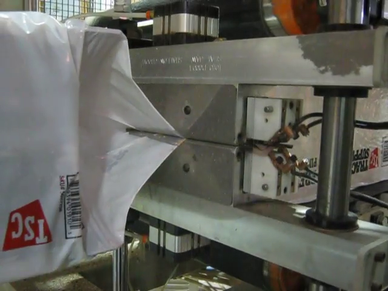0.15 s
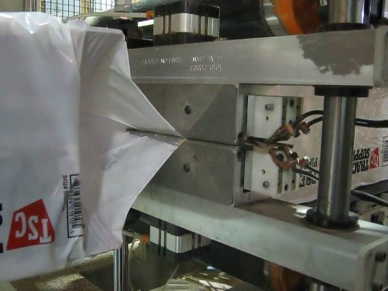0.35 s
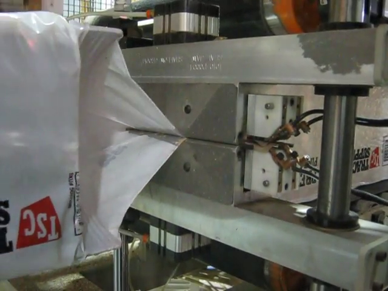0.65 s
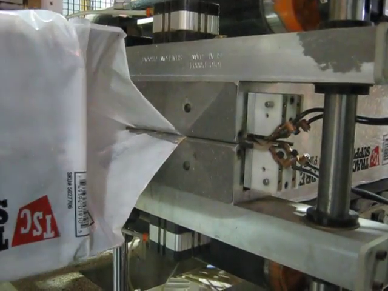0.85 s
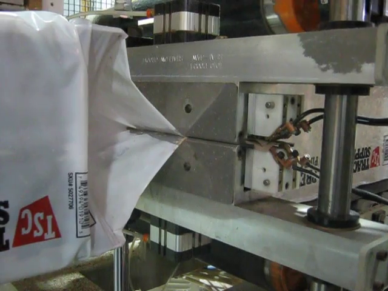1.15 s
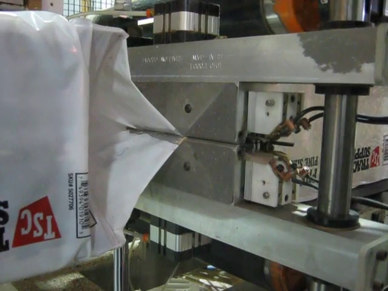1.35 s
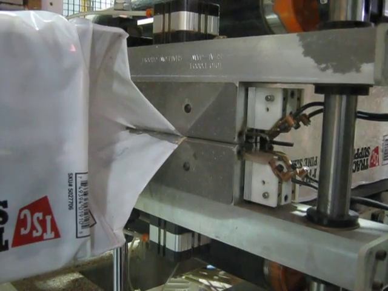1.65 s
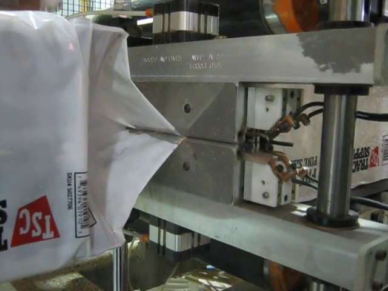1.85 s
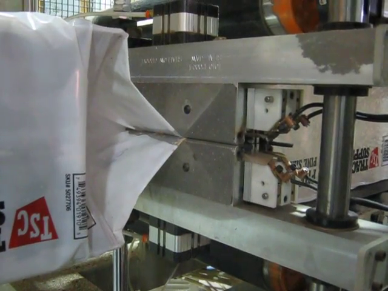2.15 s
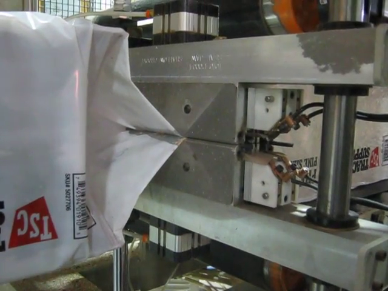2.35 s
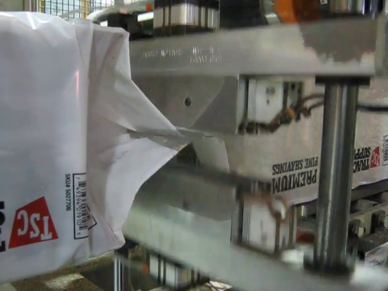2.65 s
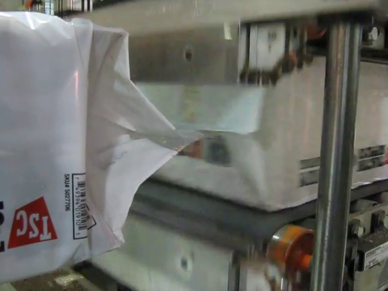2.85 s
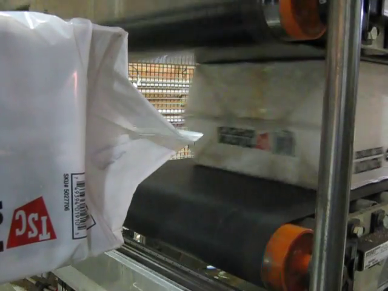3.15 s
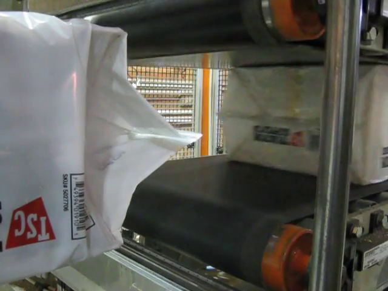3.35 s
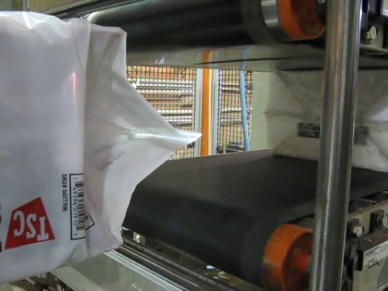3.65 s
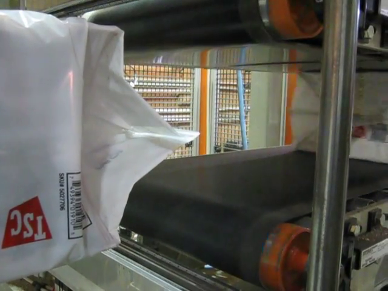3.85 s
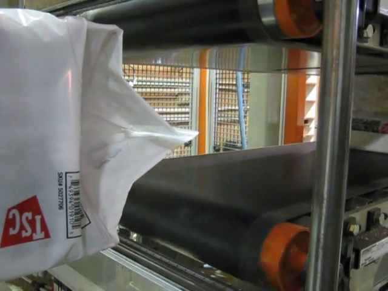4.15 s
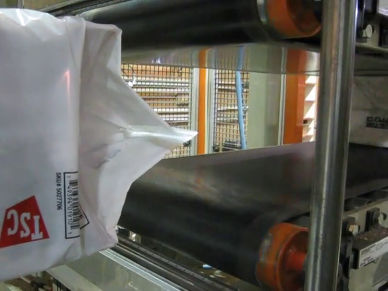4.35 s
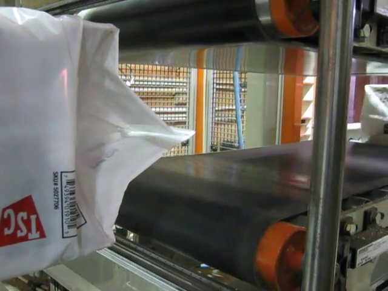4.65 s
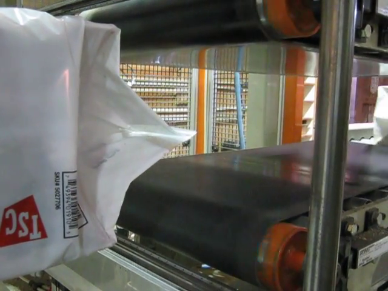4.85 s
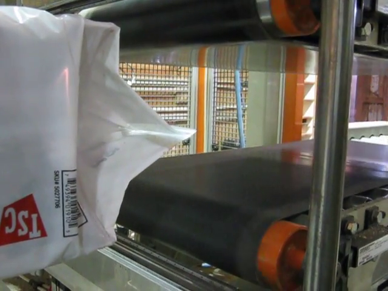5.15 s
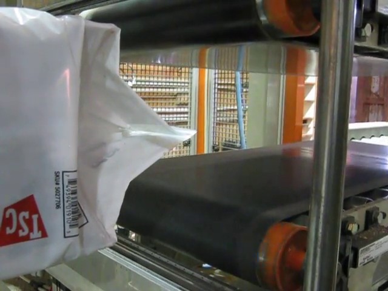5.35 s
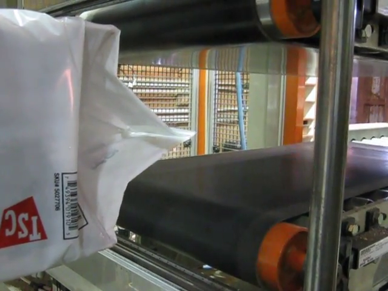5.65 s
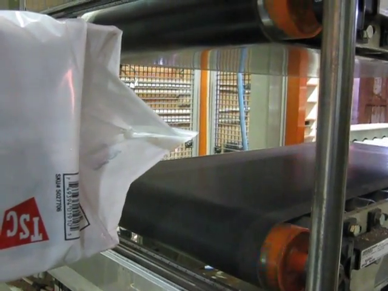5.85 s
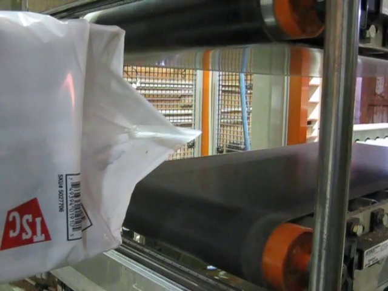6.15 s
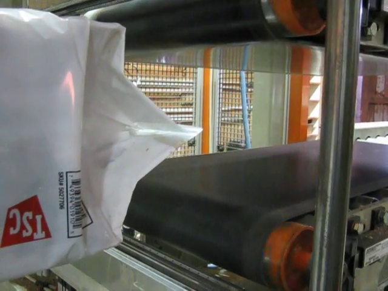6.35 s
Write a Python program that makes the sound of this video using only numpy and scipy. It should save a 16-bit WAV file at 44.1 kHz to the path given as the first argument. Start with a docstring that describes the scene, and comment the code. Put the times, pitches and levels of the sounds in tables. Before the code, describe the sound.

Close to a bagging machine in a factory hall, a wavering blower drone around 535 Hz, steady motor whines and a broad, grainy conveyor roar begin at once. Air hisses until about 0.7 s, with small steel knocks and rattles; a heavy jaw thump hits at 0.69 s and a sharp clack at 0.93. From 1.2 s a brighter air blast spurts amid more knocks, and the hum and roar sink, slowly creeping back as the hiss thins after 2.5. Around 2.95 s the belt starts: the background returns fuller, with faint high sizzle and short whines from 3.8 s. Rattles at 5.3 s precede a violent steel bang at 5.6, briefly ducking everything. A louder conveyor rush and low rumble follow, with several whines and renewed hiss from 6.1 s to the end. The microphone sounds small and dull on top, with slight metallic hall echo.

```python
"""A blower hums, motors whine and belts roar at once, with hissing air: a bagging machine in a factory hall.
Hum and whine are wavering sines; roar, hiss and the floor's rumble are noise shaped by spectra.
Knocks are short noise bursts that ring the steel frame, and thumps are low sines that die away.
The recorder turns the hall down under the loud air blast, then its gain creeps back up.
Then the belt carries a bag away and sizzles. The gain also ducks after the hardest knocks."""
import sys
import numpy as np
from scipy import signal
from scipy.fft import rfft, irfft
from scipy.io import wavfile
from scipy.ndimage import uniform_filter1d

SR = 44100
rng = np.random.default_rng(int(sys.argv[2]) if len(sys.argv) > 2 else 0)


def generate_wav(sig):
    """Save sig (samples, or channels by samples) to the path in sys.argv[1] as 16-bit PCM at SR."""
    pcm = np.round(np.clip(np.atleast_2d(sig).T, -1, 1) * 32767).astype(np.int16)
    wavfile.write(sys.argv[1], SR, pcm)


N = 286650
TIME = np.arange(N) / SR  # seconds

# All levels are those before record(); spectra made even afterwards give only the tone colour.
# Turning speed of the blower, heard as a pitch: time_s, pitch_hz
BLOWER_PITCH = [(1.2, 266.8), (1.9, 267.3), (3.0, 266.1), (5.4, 268.8), (6.5, 267.5)]
# The blower's strong second order (twice that pitch), before the ducking: time_s, level_db
DRONE_LEVEL = [(0, -21), (.15, -26), (.55, -22), (.92, -20), (1.0, -21.5), (1.2, -18), (1.26, -43),
               (1.47, -22.5), (2.5, -20), (3.2, -19.5), (3.5, -17.5), (5.3, -17.5), (5.65, -26.5),
               (5.9, -26), (6.12, -23.5), (6.2, -53)]
# The blower's other orders, before HUM_CHANGE and the ducking: pitch_multiple, level_db
BLOWER_ORDERS = [(1, -32.5), (3, -35), (6, -53.5), (8, -53), (9, -54.5), (10, -54.5), (11, -52.5)]
# Steady motors in the hall, before HUM_CHANGE and the ducking: pitch_hz, level_db
HALL_MOTORS = [(60, -49.5), (238, -40.5), (366, -43), (882, -43.5), (1070, -45), (1336, -46), (3106, -55.5)]
# Change in strength of the other orders and hall motors, before the ducking: time_s, change_db
HUM_CHANGE = [(0, 2), (.7, -5), (3.3, 4), (5.5, 3.5), (6.5, -9)]
# Whine of the belt drive, before the ducking: time_s, level_db
WHINE_LEVEL = [(0, -31), (1.3, -43.5), (1.8, -31), (3.1, -31.5), (3.9, -32.5), (4.5, -41), (6.5, -41.5)]
# Short whines of the moving parts: start_s, end_s, first_pitch_hz, last_pitch_hz, level_db
SHORT_WHINES = [(3.828, 4.297, 368.6, 368.4, -29), (4.417, 5.534, 1071, 1072, -37.5),
                (4.845, 5.109, 364, 367, -31), (5.3, 5.628, 795, 793, -30),
                (5.858, 6.17, 2130, 2146, -33.5), (5.912, 6.174, 364, 363.4, -28.5),
                (6.104, 6.222, 650, 856, -29), (6.27, 6.6, 1889, 1900, -34.5),
                (6.28, 6.522, 331.5, 375, -27), (5.794, 6.58, 899, 838, -33),
                (5.773, 6.17, 1309, 1306, -31.5), (6.205, 6.523, 1180, 1356, -38)]
# Tone colour of the conveyor roar: frequency_hz, relative_level_db_per_hz
ROAR_SPECTRUM = [(25, -25.5), (42, -14), (56, -7.5), (90, -5.5), (150, 0.5), (230, 4), (440, 1), (820, 1.5),
                 (1200, -7), (2300, -9.5), (3800, -15.5), (5000, -16), (7000, -15.5)]
# The roar swells for a moment as the bag is shoved along: middle_s, swell_db
BAG_SHOVES = [(.05, 2.5), (.28, 2), (.52, 3.5), (.87, 3.5), (1.19, 5), (3.08, 1.5), (3.37, 2)]
# Tone colour of compressed air: frequency_hz, relative_level_db_per_hz
AIR_SPECTRUM = [(200, -19), (700, -7), (1400, -2.5), (2000, -0.5), (2500, 1.5), (3050, -0.5), (3450, 1),
                (4100, -1), (4750, -2), (5200, -3), (7000, -4.5)]
# Air valves, with levels at the set opening time: open_s, close_s, level_db, treble_change_db, rise_s
AIR_VALVES = [(-.05, 0.705, -23, -1.5, .03), (1.211, 1.676, -22.5, 2.5, .04),
              (1.68, 2.472, -25.1, 5.5, .03), (2.466, 5.38, -30.5, 8.5, 0.027),
              (3.003, 3.852, -41, -15.5, .25), (6.08, 6.6, -25.5, -1.5, 0.28)]
# Tone colour of the floor rumble: frequency_hz, relative_level_db_per_hz
RUMBLE_SPECTRUM = [(22, -11.5), (45, -5), (90, -1.5), (140, -6.5), (250, -34), (600, -71)]
# Strength of the floor rumble: time_s, level_db
RUMBLE_STRENGTH = [(0, -48), (.7, -45.5), (1.3, -44.5), (1.6, -48), (3.3, -49), (4.2, -54.5), (5.4, -44.5),
                   (6.4, -36)]
# Sharp knocks on the steel frame: peak_s, level_db, centre_hz, width_octaves
FRAME_KNOCKS = [(.012, -21, 1470, 1.3), (.127, -18.5, 2400, 0.51), (.674, -20.5, 1400, 0.86),
                (.93, -13.5, 1550, 1.7), (1.222, -19.5, 1190, 1.6), (1.362, -21, 1380, 0.59),
                (5.604, -1, 856, 1.2), (5.621, -16.5, 2860, 0.38)]
# Looser rattles of the mechanism: peak_s, level_db, centre_hz, width_octaves
LOOSE_RATTLES = [(.251, -19.5, 230, 1.2), (.31, -26.5, 2200, 0.33), (.938, -14.5, 990, 1.03),
                 (1.272, -25.5, 1830, 0.45), (1.298, -25, 1100, 0.86), (1.34, -21.5, 450, 0.64),
                 (3.17, -22.5, 390, .6), (5.328, -21.5, 1175, 0.75), (5.362, -21.5, 1105, 0.62),
                 (5.588, -22.5, 1290, 1.5), (6.49, -20, 1481, 0.87)]
# Ring of the frame; fades longer than 0.25 s are cut to that: pitch_hz, relative_level_db, fade_60db_s
FRAME_RING = [(754, -5.5, 0.045), (1066, 0.5, 0.037), (1306, -4.5, 0.11), (1860, -14, 0.31),
              (2620, -4, 0.09), (2880, -21, 0.62), (3763, -25.5, 0.15)]
# Dull thumps of the jaws and their cylinder: start_s, level_db, pitch_hz, fade_60db_s
JAW_THUMPS = [(.688, -1, 299, 0.039), (0.689, -12, 185, 0.15), (.693, -16.5, 322, 0.29),
              (.737, -12, 174, 0.065), (1.334, -26.5, 134, 0.77), (5.597, -12.5, 75, 0.079)]
# Tone colour of the running belt's thin sizzle: frequency_hz, relative_level_db_per_hz
SIZZLE_SPECTRUM = [(4200, -30), (4750, 0), (4900, 0), (5100, -4.5), (5400, -8), (6200, -28)]
# Treble fall of the recorder: frequency_hz, change_db
RECORDER_TREBLE = [(4900, -1.5), (5500, -5), (6000, -12.5), (6400, -21.5), (6800, -34), (7100, -48)]

# The air blast turns the hall down, the belt starts as the ducking ends, then the feed conveyor starts
BLAST_S, BELT_S, FEED_S = 1.187, 2.944, 5.55
DUCK_TAKES_S, BELT_TAKES_S, FEED_TAKES_S = 0.62, 0.1, 0.03
# The recorder turns the hall down under the loud air blast, then its gain creeps back up
HALL_DUCK_DB, DUCK_RECOVERY_DB_PER_S = -9.5, 3
# The drone wavers (dB rms), less while the belt runs
WAVER_DB, WAVER_RUNNING_DB = 0.68, 0.43
WHINE_HZ = 1307
# Roar at rest, and what the running belt and the feed conveyor add
ROAR_DB, BELT_ADDS_DB, FEED_ADDS_DB = -26, 1, 6.5
SHOVE_S = 0.045  # time from a swell's middle until it has shrunk to 37 percent
JET_SAG_DB_PER_S, JET_RELEASE_S, LEAK_DB = 2, 0.033, -46.5
SIZZLE_DB = -45.5
# Rise by a factor of 2.72 and fade by 60 dB
KNOCK_RISE_S, KNOCK_FADE_S = 0.0022, 0.06
RATTLE_RISE_S, RATTLE_FADE_S = 0.012, 0.22
EDGE_HZ = 7100  # upper edge of the recorder's band
CEILING = 0.41  # peaks round off at this share of full scale


def gain_of(db):
    """Turns decibels into a multiplier for the wave."""
    return 10 ** (np.asarray(db) / 20)


def evened(x):
    """Scales a sound to an average strength (rms) of 1."""
    return x / np.sqrt(np.mean(x ** 2) + 1e-20)


def course(rows):
    """Joins the points of a table by straight lines in time."""
    return np.interp(TIME, *np.transpose(rows))


def coloured(x, points):
    """Filters a sound by a dB curve drawn over log frequency."""
    hz, db = np.transpose(points)
    bins = np.fft.rfftfreq(len(x), 1 / SR)
    curve_db = np.interp(np.log(bins + 1), np.log(hz), db)
    return irfft(rfft(x) * gain_of(curve_db), len(x))


def noise_of(spectrum):
    """Full-length noise with the given tone colour and an rms of 1."""
    return evened(coloured(rng.standard_normal(N), spectrum))


def drift(rate):
    """Random wandering of rms 1, mostly slower than rate in Hz."""
    bins = np.fft.rfftfreq(N, 1 / SR)
    return evened(irfft(rfft(rng.standard_normal(N)) / (1 + (bins / rate) ** 4), N))


def add(mix, s, sound):
    """Adds a sound into the mix at time s, cut where the mix ends."""
    part = mix[max(round(s * SR), 0):][:len(sound)]
    part += sound[:len(part)]


def ramp(start, takes):
    """Rises from 0 to 1, beginning at start."""
    return np.clip((TIME - start) / takes, 0, 1)


def hall_ducking():
    """How far the recorder's gain lowers hum, steady whines and roar under the air blast, in dB."""
    ducked = ramp(BLAST_S, DUCK_TAKES_S) * (1 - ramp(BELT_S, BELT_TAKES_S))
    return ducked * (HALL_DUCK_DB + DUCK_RECOVERY_DB_PER_S * (TIME - BLAST_S))


def belt_running():
    """Rises to 1 as the belt starts, and back to 0 when the feed conveyor takes over."""
    return ramp(BELT_S, BELT_TAKES_S) * (1 - ramp(FEED_S, FEED_TAKES_S))


def blower():
    """One turning shaft gives tones at multiples of its speed; the second is a loud, clean drone."""
    turns = np.cumsum(course(BLOWER_PITCH) + 0.15 * drift(25)) / SR
    waver_db = WAVER_DB + (WAVER_RUNNING_DB - WAVER_DB) * belt_running()
    drone_gain = gain_of(course(DRONE_LEVEL) + waver_db * drift(29))
    drone = drone_gain * np.sin(4 * np.pi * turns)
    orders = np.zeros(N)
    for multiple, db in BLOWER_ORDERS:
        wave = np.sin(2 * np.pi * (multiple * turns + rng.random()))
        orders += gain_of(db + 1.3 * drift(6.2)) * wave
    # The root of 2 gives each sine an rms of 1 before its level
    return np.sqrt(2) * gain_of(hall_ducking()) * (drone + gain_of(course(HUM_CHANGE)) * orders)


def tone(hz, waver_hz, flutter):
    """A sine near rms 1 that wavers in pitch and strength."""
    turns = np.cumsum(hz + waver_hz * drift(15.6)) / SR + rng.random()
    return np.sqrt(2) * np.sin(2 * np.pi * turns) * (1 + flutter * drift(3.2))


def motors():
    """Motors and the belt drive whine as long, wavering tones; moving parts whine briefly."""
    steady = sum(gain_of(db) * tone(hz, waver_hz=1.0, flutter=0.3) for hz, db in HALL_MOTORS)
    out = steady * gain_of(0.96 * (course(HUM_CHANGE) + hall_ducking()))
    whine_gain = gain_of(course(WHINE_LEVEL) + hall_ducking())
    out += whine_gain * tone(WHINE_HZ, waver_hz=1.2, flutter=0.13)
    for start, end, first_hz, last_hz, db in SHORT_WHINES:
        # Each fades in and out over 0.039 s
        running = np.clip(np.minimum(TIME - start, end - TIME) / 0.039, 0, 1)
        pitch_hz = np.interp(TIME, [start, end], [first_hz, last_hz])
        out += gain_of(db) * running * tone(pitch_hz, waver_hz=1.53, flutter=0.065)
    return out


def conveyors():
    """Rolling belts make a wide, uneven roar, and their rollers a fine chatter of tiny bursts."""
    roll = coloured(rng.standard_normal(N), ROAR_SPECTRUM) * gain_of(0.71 * drift(30))
    # About 160 random ticks a second, each a burst that fades 60 dB in 0.01 s
    ticks = rng.standard_normal(N) * (rng.random(N) < 160 / SR)
    t = np.arange(1500) / SR
    tick_sound = rng.standard_normal(len(t)) * gain_of(-60 * t / 0.01)
    chatter = coloured(signal.oaconvolve(ticks, tick_sound)[:N], ROAR_SPECTRUM)
    roar = evened(evened(roll) + gain_of(-15.5) * evened(chatter))
    load_db = BELT_ADDS_DB * belt_running() + FEED_ADDS_DB * ramp(FEED_S, FEED_TAKES_S)
    shoves_db = sum(db * np.exp(-((TIME - s) / SHOVE_S) ** 2) for s, db in BAG_SHOVES)
    return gain_of(ROAR_DB + load_db + shoves_db + 0.99 * hall_ducking()) * roar


def air():
    """Compressed air hisses from the valves, sputtering slightly and sagging as the pressure falls."""
    jet = noise_of(AIR_SPECTRUM)
    treble = coloured(jet, [(3000, -32.0), (5400, -4.0)])
    out = gain_of(LEAK_DB) * noise_of(AIR_SPECTRUM)
    for opens, closes, db, treble_db, rise in AIR_VALVES:
        valve = ramp(opens, rise) * (1 - ramp(closes, JET_RELEASE_S))
        pressure = gain_of(db - JET_SAG_DB_PER_S * (TIME - opens))
        out += valve * pressure * (jet + (gain_of(treble_db) - 1) * treble)
    return out * gain_of(1.2 * drift(70))


def housing(x, reflect_db=-15):
    """Quick echoes scattered between the steel plates give a slightly hollow colour."""
    t = np.arange(800) / SR
    scatter = rng.standard_normal(len(t)) * gain_of(-60 * t / 0.26) * (t > 0.002)
    echoes = coloured(scatter, [(400, -2.5), (1500, -3.5)])
    return x + gain_of(reflect_db) * signal.oaconvolve(x, echoes / np.linalg.norm(echoes))[:N]


def rumble():
    """The heavy frame shakes the floor: low noise, strongest when the feed conveyor runs."""
    return gain_of(course(RUMBLE_STRENGTH) + 1.8 * drift(11)) * noise_of(RUMBLE_SPECTRUM)


def bursts(rows, rise, fade):
    """Each blow is a dense burst of contacts, made of noise that swells and dies away."""
    out, t = np.zeros(N), np.arange(SR // 2) / SR
    octave = np.log2(np.fft.rfftfreq(len(t), 1 / SR) + 1)
    lead = 0.1  # seconds of swell ahead of the peak
    swell = np.exp(np.minimum(t - lead, 0) / rise) * gain_of(-60 * np.maximum(t - lead, 0) / fade)
    for s, db, hz, octaves in rows:
        band = 1 / (1 + ((octave - np.log2(hz)) / octaves) ** 4)
        burst = evened(irfft(rfft(rng.standard_normal(len(t))) * band, len(t)))
        blow = gain_of(db) * burst * swell
        # Leave out any part that would come before time 0
        add(out, s - lead, blow[max(round((lead - s) * SR), 0):])
    return out


def clacks():
    """Knocks and rattles set the steel frame ringing at its own pitches."""
    out = bursts(FRAME_KNOCKS, KNOCK_RISE_S, KNOCK_FADE_S)
    out += bursts(LOOSE_RATTLES, RATTLE_RISE_S, RATTLE_FADE_S)
    t = np.arange(SR // 2) / SR
    ring = np.zeros(len(t))
    for hz, db, fade in FRAME_RING:
        ring += gain_of(db - 60 * t / min(fade, 0.25)) * np.sin(2 * np.pi * hz * t)
    return out + gain_of(-19) * signal.oaconvolve(out, ring / np.linalg.norm(ring))[:N]


def hall_echo(x):
    """The factory hall spreads a sound into a dull tail, modelled by fading noise."""
    t = np.arange(SR) / SR
    fading = rng.standard_normal(SR) * gain_of(-60 * t / 0.53) * (1 - np.exp(-t / 0.017))
    tail = coloured(fading, [(1000, 4), (6000, -14.5)])
    return signal.oaconvolve(x, tail / np.linalg.norm(tail))[:N]


def thumps():
    """Heavy parts meet their stops and ring low, as sines that die away."""
    out, t = np.zeros(N), np.arange(SR // 2) / SR
    onset = 1 - np.exp(-t / 0.00092)
    for s, db, hz, fade in JAW_THUMPS:
        add(out, s, gain_of(db - 60 * t / fade) * np.sin(2 * np.pi * hz * t) * onset)
    return out


def sizzle():
    """The belt slides over its bed with a narrow, high hiss."""
    return belt_running() * gain_of(SIZZLE_DB + 1.2 * drift(25)) * noise_of(SIZZLE_SPECTRUM)


def scene():
    """Roar, sizzle and air pass through the housing; hum, rumble and echoing knocks join them."""
    knocks = clacks() + thumps()
    rush = housing(conveyors() + sizzle() + air())
    steady = blower() + motors() + rumble()
    return (steady + rush + knocks + gain_of(-20.0) * hall_echo(knocks))[None]


def record(dry, threshold_db=-14, recovery_db=38):
    """Gain ducks fast and recovers by recovery_db a second; peaks round off, then a small camera's band."""
    power_db = 10 * np.log10(abs(uniform_filter1d(dry[0] ** 2, size=220)) + 1e-12)
    # Hold each peak of the level, letting it sink steadily
    recovery = TIME * recovery_db
    held_db = np.maximum.accumulate(power_db + recovery) - recovery
    over_db = np.maximum(held_db - threshold_db, 0)
    ducked = dry[0] / gain_of(uniform_filter1d(over_db, size=80))
    rounded = ducked / (1 + (ducked / CEILING) ** 8) ** (1 / 8)
    dulled = coloured(rounded, RECORDER_TREBLE)
    low_pass = signal.firwin(511, EDGE_HZ, window=("kaiser", 9), fs=SR)
    return signal.oaconvolve(dulled, low_pass, "same")[None]


dry = scene()
out = record(dry)
generate_wav(out)
```